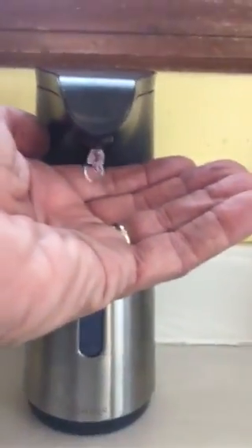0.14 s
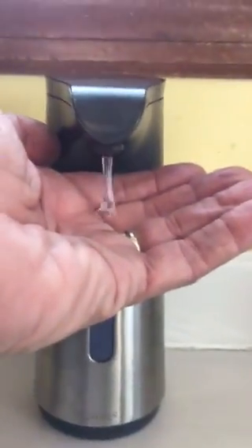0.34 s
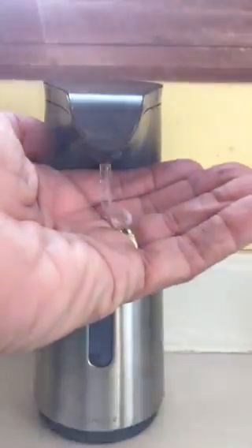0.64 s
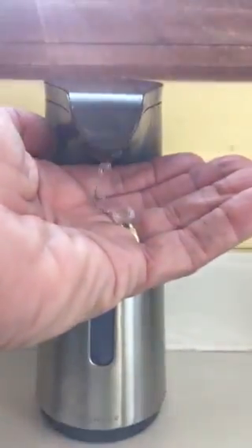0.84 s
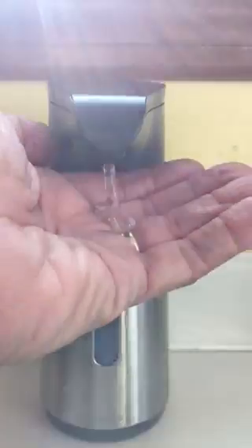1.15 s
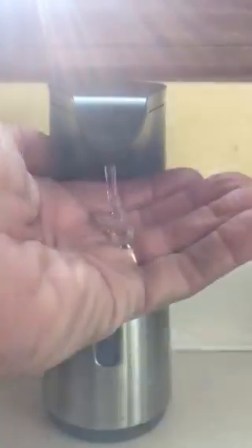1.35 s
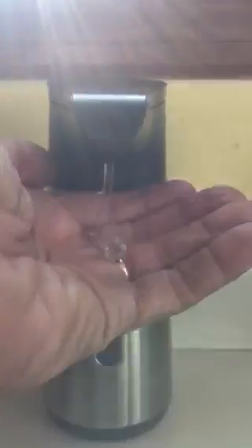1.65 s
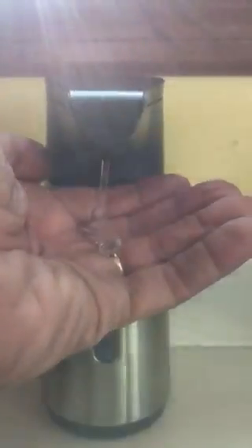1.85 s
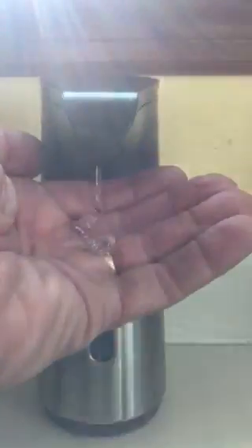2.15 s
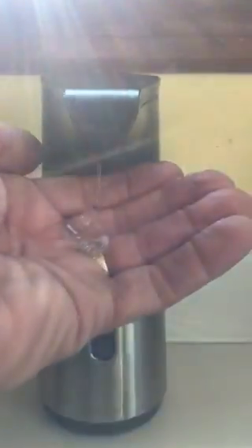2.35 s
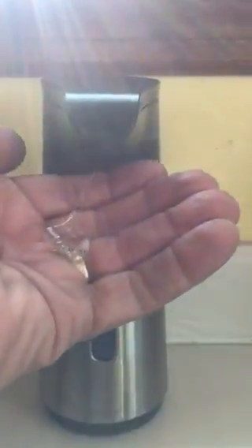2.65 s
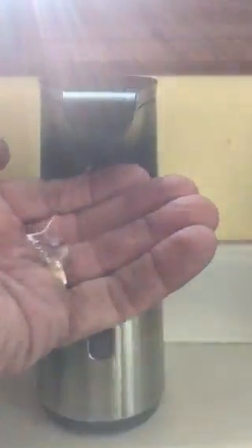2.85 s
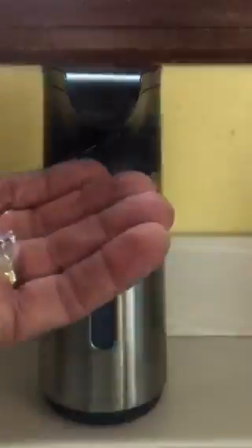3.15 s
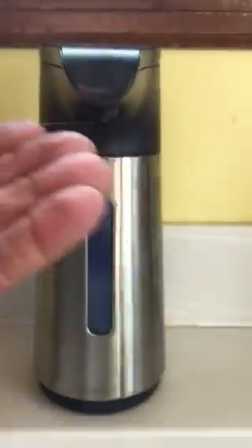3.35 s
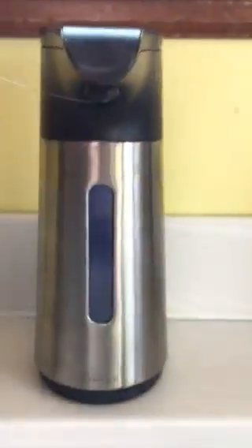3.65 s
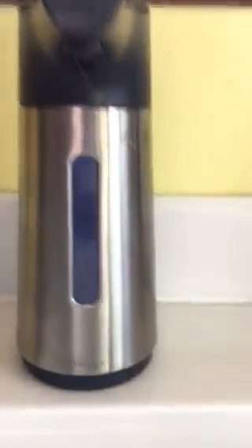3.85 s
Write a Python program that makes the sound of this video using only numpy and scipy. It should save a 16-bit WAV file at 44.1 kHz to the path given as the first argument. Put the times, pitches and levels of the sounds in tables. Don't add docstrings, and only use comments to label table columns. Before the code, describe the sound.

A small geared pump motor whirs and knocks rhythmically in a soap dispenser, then clicks to a stop.

```python
import sys
import numpy as np
from scipy import signal
from scipy.fft import rfft, irfft
from scipy.io import wavfile
from scipy.ndimage import uniform_filter1d

SR = 44100
rng = np.random.default_rng(int(sys.argv[2]) if len(sys.argv) > 2 else 0)


def natural_amplitude(level_db):
    exponent = np.asarray(level_db, float) / 20
    return 10 ** exponent


def put_to_file(sound):
    columns = np.atleast_2d(sound).T
    safe = np.clip(columns, -1, 1)
    whole_steps = np.round(safe * 32767)
    wavfile.write(sys.argv[1], SR, whole_steps.astype(np.int16))


N = 176400
T = np.arange(N) / SR
SHORT = 4096
TURN_S = 0.215
STOP_S, BACK_S, END_S = 1.668, 1.708, 2.225


def curve(table, k, at=T):
    a = np.array(table, float)
    return np.interp(at, a[:, 0], a[:, k])


def unit(x):
    return x / np.sqrt(np.mean(x ** 2) + 1e-30)


def band(x, hz, width_hz):
    return signal.lfilter(*signal.iirpeak(min(hz, 0.45 * SR), hz / width_hz, fs=SR), x)


def steep(x, hz, width_hz):
    return band(band(x, hz, width_hz), hz, width_hz)


def ring(x, modes):
    out = 0
    for hz, db, t60 in modes:
        pole = np.exp((2j * np.pi * hz - np.log(1000) / t60) / SR)
        out = out + natural_amplitude(db) * signal.lfilter([1], [1, -pole], x).imag
    return out


def walk(rate):
    held = rng.standard_normal(SHORT)[(T * rate).astype(int)]
    k = int(SR / rate)
    return unit(uniform_filter1d(uniform_filter1d(held, k), k))


def gate(on, off, rise=0.0017, fall=0.0079):
    return np.clip((T - on) / rise, 0, 1) * np.clip((off - T) / fall, 0, 1)


def add(out, s, x):
    i = int(s * SR)
    if 0 <= i < N:
        out[i:i + len(x)] += x[:N - i]


def burst(rows, width):
    out, t = np.zeros(N), T[:SHORT]
    for s, db, hz, t60 in rows:
        noise = unit(steep(rng.standard_normal(SHORT), hz, hz * width))
        fade = np.exp(-np.log(1000) * t / t60) * np.minimum(t / 0.00073, 1)
        add(out, s, natural_amplitude(db) * noise * fade)
    return out


def strike(s, db, modes, gap_s):
    x = np.zeros(N)
    for k, size in enumerate((0.3, -1, 0.35)):
        add(x, s + k * gap_s, natural_amplitude(db) * size * np.ones(1))
    return ring(x, modes[::2]) - ring(x, modes[1::2])


# pitch_hz, level_db (per Hz)
ROOM_COLOUR = [(22, -21), (40, -3), (62, 0.5), (130, -1.5), (260, -15), (600, -22.5), (2480, -34.5),
               (16000, -45.5)]
# pitch_hz, level_db
MAINS = [(60, -67), (120, -65)]


def room():
    f = np.maximum(np.fft.rfftfreq(N, 1 / SR), 1)
    a = np.array(ROOM_COLOUR)
    colour_db = np.interp(np.log(f), np.log(a[:, 0]), a[:, 1], left=-60)
    air = unit(irfft(rfft(rng.standard_normal(N)) * natural_amplitude(colour_db), N))
    low = signal.sosfilt(signal.butter(2, 400, fs=SR, output="sos"), air)
    out = natural_amplitude(-59) * (air - low + low * natural_amplitude(1.0 * walk(6.18)))
    for hz, db in MAINS:
        out = out + natural_amplitude(db + 0.74 * walk(13)) * np.sin(2 * np.pi * hz * T)
    late_hiss = unit(band(rng.standard_normal(N), 2800, 8300))
    return out + natural_amplitude(-73) * gate(3.81, 9, rise=0.18) * late_hiss


# start_s, level_db
TURNS = [(0.113, -30.5), (0.327, -31.5), (0.542, -30.5), (0.757, -30.5), (0.972, -30.5), (1.188, -31),
         (1.403, -30), (1.619, -31.5)]
# place (share of turn), level_db (added to the turn's), softness (0-1)
TEETH = [(0, -1.5, 0.12), (.118, -4.5, 0.6), (.245, -2.5, 1), (.375, -7.5, 0.67), (.505, -4.5, 0.87),
         (0.633, -8, 0.03), (.757, -3.5, 0.31), (.879, -1.35, 0.3)]
# start_s, level_db, softness (0-1)
BACK_KNOCKS = [(1.725, -43, 0.74), (1.765, -36, 0.8), (1.792, -36.5, 0.08), (1.816, -27.5, 0.7),
               (1.84, -34.5, 0.8), (1.864, -32.5, 0.45), (1.888, -35, 0.3), (1.92, -40, 0.9),
               (1.938, -40, 0.64), (1.981, -43, 0.7), (2.017, -43, .6), (2.045, -48, 1), (2.1, -44, .6)]
# pitch_hz, level_db, t60_s
HOUSING = [(364, -41, 0.03), (444, -12.5, 0.13), (594, -15, 0.089), (625, 1, 0.059), (782, -6.5, 0.06),
           (862, -4.5, 0.038), (1085, 2.5, 0.031), (1166, 0, 0.034), (1347, 0.5, 0.036), (1737, -7.5, 0.04),
           (1880, -5.5, 0.027), (2265, -14, 0.052), (3673, -3, 0.033)]
# pitch_hz, level_db, t60_s
BACK_HOUSING = [(365, -10, 0.079), (446, -8.5, 0.083), (617, 0.5, 0.047), (803, 1, .03), (883, -4.5, 0.064),
                (1074, 0, 0.048), (1155, -1, 0.032), (1310, -12, 0.04), (2200, -8, 0.012),
                (3690, -4, 0.013)]


def tooth_times():
    first, last = TURNS[0], TURNS[-1]
    starts = [(first[0] - TURN_S, first[1] - 2.0)] + list(TURNS) + [(last[0] + TURN_S, -200)]
    rows = []
    for (s, db), nxt in zip(starts, starts[1:]):
        for place, tooth_db, soft in TEETH:
            runs = s + place * TURN_S < STOP_S
            rows.append((s + place * (nxt[0] - s), db + tooth_db if runs else -200, soft))
    return rows + list(BACK_KNOCKS)


def push(t, at, width_s):
    return np.exp(-0.5 * ((t - at) / width_s) ** 2) * 0.00008 / width_s


def knocks():
    x, t = np.zeros(N), T[:SHORT // 4]
    for s, db, soft in tooth_times():
        c = rng.standard_normal(len(t))
        blow = -push(t, 0.003557, 0.00005 + 0.0001 * soft)
        blow = blow + 0.31 * push(t, 0.00141, 0.00006)
        blow = blow - 0.25 * push(t, 0.0105 + 0.00062 * c[1], 0.0001)
        scrape = 0.11 * c * np.exp(-t / 0.0065) * np.minimum(t / 0.0018, 1)
        force = (1 - 0.39 * soft) * blow + (0.3 + 2.53 * soft) * scrape
        add(x, s - 0.002, natural_amplitude(db + 0.75 * c[0]) * force)
    rung = ring(x * (T < BACK_S), HOUSING) + ring(x * (T >= BACK_S), BACK_HOUSING)
    return natural_amplitude(-24.5) * signal.sosfilt(signal.butter(2, 440, "high", fs=SR, output="sos"), rung)


# time_s, level_db
HUM = [(0, -57.5), (.5, -57.5), (.9, -53.5), (1.66, -54), (1.7, -65), (1.745, -53.5), (1.8, -67.5),
       (1.95, -61.5), (2.0, -67), (2.22, -62), (2.3, -95)]


def hum(angle):
    return natural_amplitude(curve(HUM, 1) + 4.0 + 1.9 * walk(7.4)) * (np.sin(angle) + natural_amplitude(-17.5) * np.sin(2 * angle))


# place (share of turn), speed_hz, whine_db
SHAFT = [(0, 146, -56.5), (.15, 141.4, -59.5), (.33, 133.1, -57.5), (.5, 134.3, -63), (.66, 141.2, -53.5),
         (.85, 141, -57.5), (1.0, 144, -70)]


def whine(angle, share, fore, back):
    teeth = np.sin(12 * angle)
    forward = natural_amplitude(curve(SHAFT, 2, share) + 0.73 * walk(60.1)) * teeth * natural_amplitude(-0.5) * fore
    backward = natural_amplitude(-58.5) * teeth + natural_amplitude(-58.5) * np.sin(6 * angle)
    return forward + back * natural_amplitude(3.0 * walk(29.9)) * backward


# pitch_hz, width_hz, level_db
BRUSHES = [(4460, 66, -14), (5600, 62, 13), (7170, 530, 3), (8030, 100, 2.5), (9130, 105, 1),
           (10860, 180, 0.5), (11800, 240, -1), (9000, 3400, 0)]


def brushes(share, fore, back):
    tooth = np.interp(share, [r[0] for r in TEETH] + [1], np.arange(len(TEETH) + 1))
    pulse = 0.28 + np.exp(-(2 * tooth % 1) / 0.22)
    ticks = rng.standard_normal(N) * natural_amplitude(2.0 * walk(150)) * pulse
    air = 0.42 * ticks + rng.standard_normal(N)
    cap_hz, cap_width_hz = 3720, 300
    cap = unit(band(band(ticks, cap_hz, 4.4 * cap_width_hz), cap_hz, cap_width_hz))
    cap = natural_amplitude(-62) * cap * (fore + natural_amplitude(-7.0) * back)
    hiss = unit(sum(natural_amplitude(db) * band(air, hz, w) for hz, w, db in BRUSHES))
    settling = natural_amplitude(1.2 * np.exp(-T / 0.29))
    hiss = hiss * (natural_amplitude(-69.5) * fore * settling + natural_amplitude(-70.5) * back)
    back_rise = np.clip((T - BACK_S) / 0.062, 0, 1)
    return cap + hiss + natural_amplitude(-76) * back * back_rise * unit(steep(air, 7860, 3400))


# pitch_hz, width_hz, level_db
WHIRR = [(404, 20, -21), (602, 34, -4), (846, 58, -2.5), (1055, 240, -7), (1683, 88, -9.5), (1965, 45, -16),
         (3610, 57, -10.5)]
# pitch_hz, width_hz, level_db
BACK_WHIRR = [(754, 177, -7), (1220, 128, 1.5), (2200, 170, -43), (3620, 62, -19), (643, 72, -3.5),
              (380, 26, -12)]


def whirr(peaks, rough_db, rate, broad_db):
    x = rng.standard_normal(N) * natural_amplitude(rough_db * walk(rate))
    lines = 0
    for k, (hz, width_hz, db) in enumerate(peaks):
        lines = lines + (-1) ** k * natural_amplitude(db) * band(x, hz, 1.65 * width_hz)
    broad = natural_amplitude(broad_db) * unit(steep(x, 990, 1270))
    shell = natural_amplitude(-6.5) * unit(steep(x, 2126, 590))
    return unit(lines) + broad + shell + natural_amplitude(-18.5) * unit(band(x, 356, 29))


# time_s, speed_hz, level_db
BACK = [(1.71, 169.3, -4.5), (1.77, 178.6, -1), (1.83, 164.1, -0.5), (1.875, 155.3, -2.5),
        (1.96, 149.2, -1.5), (2.0, 170.7, -2.5), (2.06, 167.8, -3), (2.12, 167.5, -2.5), (2.22, 139.4, 1.5)]


def motor():
    at = np.array([r[0] for r in TURNS])
    starts = np.r_[at[0] - TURN_S, at, at[-1] + TURN_S]
    share = np.interp(T, starts, np.arange(len(at) + 2)) % 1
    fore = gate(-1, STOP_S)
    back = gate(BACK_S, END_S, fall=0.022) * natural_amplitude(curve(BACK, 2))
    hz = np.where(T < BACK_S - 0.02, curve(SHAFT, 1, share), curve(BACK, 1))
    hz = hz * (1 + 0.00407 * walk(40.08))
    angle = 2 * np.pi * np.cumsum(uniform_filter1d(hz, size=400)) / SR
    out = hum(angle) + whine(angle, share, fore, back) + brushes(share, fore, back)
    out = out + natural_amplitude(-53.5) * fore * whirr(WHIRR, 2.9, 120, -9.5)
    return out + natural_amplitude(-54) * back * whirr(BACK_WHIRR, 1.5, 90, -20)


# start_s, level_db, pitch_hz, t60_s
CRACKLES = [(.028, -51.5, 5570, 0.039), (.04, -50.5, 13000, .02), (.095, -53.5, 7900, 0.011),
            (.281, -44.5, 5800, 0.051), (.31, -61, 12000, 0.018), (.425, -53.5, 6800, .02),
            (.445, -41.5, 3900, 0.021), (.592, -58, 8000, .015), (.7385, -33.5, 3860, 0.023),
            (.767, -56, 9000, 0.02), (1.519, -53.5, 5540, 0.043), (2.05, -64, 14300, 0.14),
            (2.258, -59, 7000, 0.007), (2.258, -56, 12500, 0.007), (.739, -49, 5050, 0.0096),
            (.74, -48, 7650, 0.013), (.283, -51, 9600, 0.027), (1.52, -53.5, 9000, 0.019),
            (2.5563, -57, 7100, 0.013), (2.5563, -62, 12500, .012), (3.2, -58.5, 960, 0.068),
            (2.996, -61, 2300, 0.04), (2.998, -66, 960, .05), (3.188, -69, 8500, .015),
            (3.198, -56, 1780, 0.04), (3.199, -63, 2550, 0.026)]


def crackles():
    return burst(CRACKLES, width=0.31)


# start_s, level_db, pitch_hz, t60_s
CLICKS = [
    (1.71, -53.5, 3030, 0.014),
    (1.981, -40.5, 2530, 0.02),
    (2.142, -36, 2530, 0.019),
    (2.1689, -33, 2520, 0.019),
    (2.188, -53, 4850, 0.02),
    (2.1944, -31.5, 2550, 0.028),
]
# pitch_hz, level_db, t60_s
LATCH = [(132, -4.5, 0.13), (265, -14, 0.069), (351, -9, 0.13), (1160, 5, 0.034), (2110, 9, 0.0075),
         (2570, -1, 0.0093), (3647, 0, 0.014), (5430, -27, 0.0085), (9500, 6.5, 0.0034), (13000, -9, .003)]


def clicks():
    out, shoves = np.zeros(N), np.zeros(N)
    for s, db, hz, t60 in CLICKS:
        out = out + strike(s, db - 6.5, LATCH[3:], 0.00065)
        add(shoves, s + 0.00066, -natural_amplitude(db - 5.5) / 20 * np.ones(20))
    return out + ring(shoves, LATCH[:3]) + natural_amplitude(-9.5) * burst(CLICKS, width=4.5)


# start_s, level_db, pitch_hz, t60_s
SLACK = [
    (1.72, -56, 354, 0.23),
    (1.775, -49, 282, 0.23),
]


def slack():
    return burst(SLACK, width=0.88)


# pitch_hz, level_db, t60_s
PING = [(2223, 0, .022), (2340, -2, .016), (3095, -13, .02), (3700, -14, .015)]


def ping():
    return strike(1.7665, -40.5, PING, 0.00152)


# start_s, end_s, level_db
GRIND = [
    (2.138, 2.251, -69),
    (2.186, 2.195, -56),
    (2.226, 2.28, -74),
]


def grind():
    grit = unit(steep(rng.standard_normal(N) * natural_amplitude(3.6 * walk(200)), 8400, 17000))
    loudness = sum(natural_amplitude(db) * gate(s, end, rise=0.002, fall=0.55 * (end - s)) for s, end, db in GRIND)
    return loudness * grit


# pitch_hz, level_db
JUDDER = (646, -37)
# start_s, end_s
JUDDER_S = (2.242, 2.26)


def judder():
    hz, db = JUDDER
    rub = np.sin(2 * np.pi * hz * T) + 0.8 * unit(band(rng.standard_normal(N), 1400, 2000))
    rub = rub * gate(*JUDDER_S, rise=0.006, fall=0.005)
    return natural_amplitude(db) * (steep(rub, 1.29 * hz, 560) + 1.1 * steep(rub, 1075, 350) + 0.54 * steep(rub, 2120, 250))


# start_s, end_s
RUSTLE_S = [
    (2.265, 2.32),
    (2.33, 2.42),
    (2.562, 2.64),
    (3.198, 3.25),
]
RUSTLE_DB = [-89, -61, -69.5, -63]


def rustles():
    noise = unit(steep(rng.standard_normal(N), 1170, 1270))
    out = np.zeros(N)
    for (s, end), db in zip(RUSTLE_S, RUSTLE_DB):
        out = out + natural_amplitude(db) * noise * gate(s, end, rise=0.078 * (end - s), fall=1.17 * (end - s))
    return out


# pitch_hz, level_db, t60_s
TAP = [(360, 2, 0.19), (580, 1.5, 0.074), (1100, 9, 0.045), (1300, 7.5, 0.04), (1630, 10, .02),
       (2000, 6, 0.025), (2350, 7, 0.016), (2810, 1, 0.018), (3370, 3, 0.0094), (3900, 1, 0.0095),
       (4670, 6, 0.0088), (5540, -7, .03)]


def tap():
    return strike(2.5558, -54.5, TAP, 0.00064)


# start_s, level_db
THUMPS = [
    (3.357, -39.5),
    (3.433, -40.5),
]
# pitch_hz, level_db, t60_s
THUMP = [(104.4, 4.5, 0.056), (191, -8.5, 0.027), (325, -4, 0.06)]


def thumps():
    x, t, width_s = np.zeros(N), T[:SHORT], 0.00028
    main = np.exp(-0.5 * ((t - 0.003) / width_s) ** 2)
    early = np.exp(-0.5 * ((t - 0.001) / width_s) ** 2)
    for s, db in THUMPS:
        add(x, s, natural_amplitude(db - 29.5) * (main - 0.51 * early))
    return ring(x, THUMP)


def echo(near):
    t = T[:3 * SHORT]
    fade = np.exp(-np.log(1000) * t / 0.39) * (t > 0.003)
    tail = unit(steep(rng.standard_normal(len(t)), 1320, 4470) * fade) / np.sqrt(len(t))
    return natural_amplitude(-21.5) * signal.fftconvolve(near, tail)[:N]


def scene():
    near = knocks() + motor() + crackles()
    near = near + clicks() + slack() + ping() + grind()
    near = near + judder() + rustles() + tap() + thumps()
    return (near + echo(near) + room())[None]


def band_limit(x):
    return signal.sosfilt(signal.butter(12, 16360, fs=SR, output="sos"), x)


def record(dry):
    cut = signal.ellip(10, 0.2, 70, 15830, fs=SR, output="sos")
    return band_limit(signal.sosfilt(cut, dry))


dry = scene()
out = record(dry)
put_to_file(out)
```